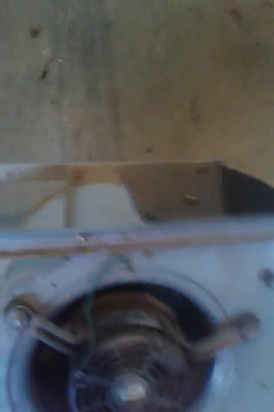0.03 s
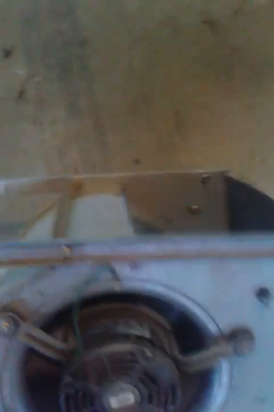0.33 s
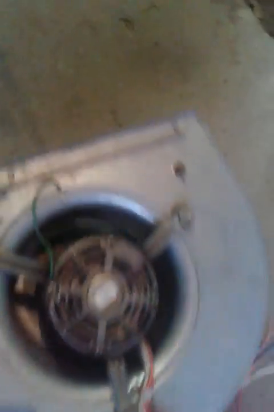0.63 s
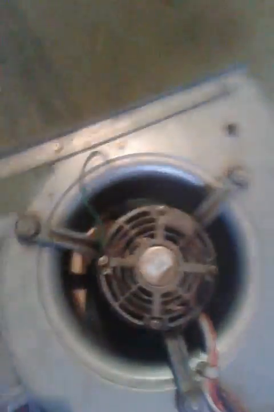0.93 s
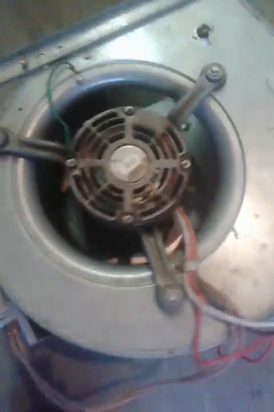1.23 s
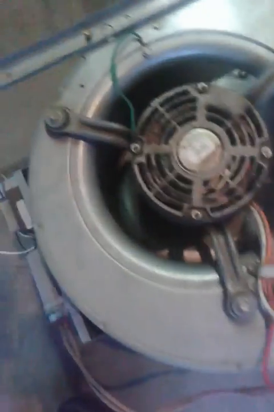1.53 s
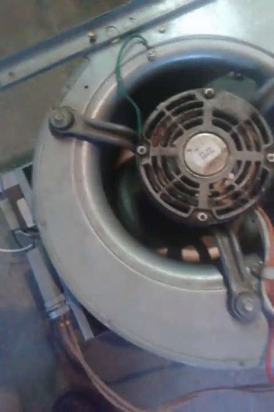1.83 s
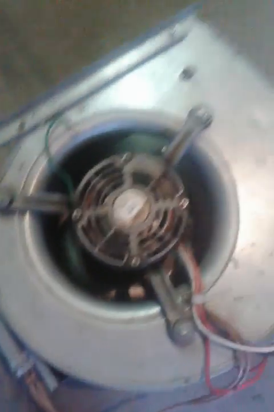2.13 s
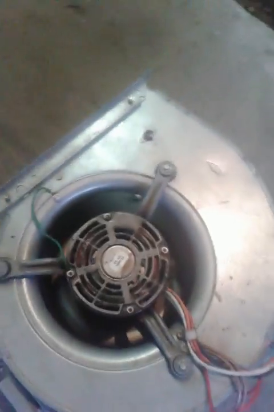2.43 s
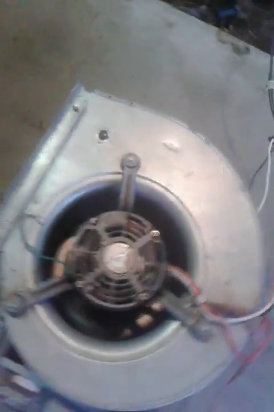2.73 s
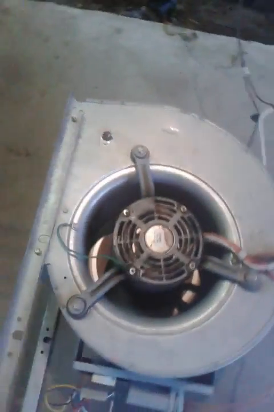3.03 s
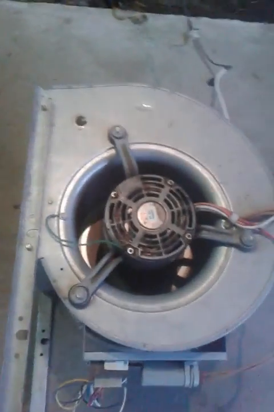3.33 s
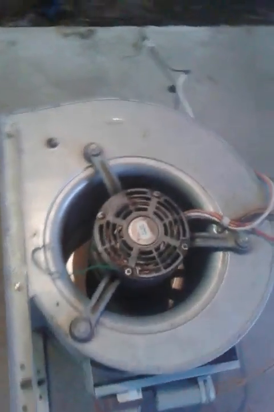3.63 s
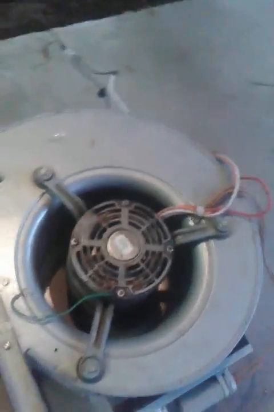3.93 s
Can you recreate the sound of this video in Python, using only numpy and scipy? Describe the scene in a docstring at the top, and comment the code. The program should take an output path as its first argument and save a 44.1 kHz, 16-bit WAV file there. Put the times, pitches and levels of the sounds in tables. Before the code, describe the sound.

A furnace blower runs with a steady roar and hiss of air, with light microphone bumps.

```python
"""A furnace blower runs on a workshop floor while a hand-held microphone moves in over its intake.
Turbulent air roars and drones in the scroll housing and hisses through the blades, with a thin wheel
whine and a faint mains hum. The colour shifts as the microphone travels from outlet to intake to back.
Near the intake the draught flutters and crackles on it, and the hand bumps it a few times."""
import sys
import numpy as np
from scipy import signal
from scipy.fft import rfft, irfft
from scipy.io import wavfile
from scipy.ndimage import uniform_filter1d

SR = 44100
rng = np.random.default_rng(int(sys.argv[2]) if len(sys.argv) > 2 else 0)


def store_wav(level_fs):
    """Save 16-bit WAV to argv[1]."""
    pcm = np.round(np.clip(np.atleast_2d(level_fs), -1, 1) * 32767)
    wavfile.write(sys.argv[1], SR, pcm.T.astype(np.int16))


N = 176400
TIME = np.arange(N) / SR

# Faders of the air noise, before trim (time [s], roar [dB], blade hiss [dB], top of the hiss [dB])
AIR_FADERS = [(0, -36, -32, -38.5), (.28, -32, -28.5, -33.5), (.58, -27.5, -26, -30.5),
              (.84, -23.5, -19, -23.5), (1.15, -24.5, -18.5, -25), (1.45, -25, -16, -27),
              (1.62, -26.5, -18, -29.5), (1.87, -27.5, -17.5, -27.5), (2.1, -26, -19.2, -25.5),
              (2.3, -25, -21, -27), (2.5, -25, -21, -27), (3, -24.5, -23, -30.5), (3.55, -25.5, -22, -29),
              (4, -23, -21, -28.5)]
# Relative EQ of the roar at each place (frequency [Hz], outlet [dB], intake [dB], back [dB])
ROAR_EQ = [(20, -30, -23, -33), (38.3, -32, -24, -36), (62.6, -7, -5, -11), (117, -1, 2.5, 1.5),
           (248, 4.5, 0.5, 8), (307, 6, 3, 4), (357, 8.5, 6.5, 0.5), (396, 7, 6, 0), (500, 1.5, -4, 3),
           (600, -3.5, -8, 5), (643, -2.5, -15, -1), (740, 3.5, 3.5, 4), (905, -3, -2, 2), (965, 5, 3, 0.5),
           (1240, -1, 1, -0.5), (1480, -4, -0.5, -1), (1840, -1, 2.5, -1), (2650, -1.5, -4.5, 1),
           (4100, -26, -7, -6.5), (7000, -46, -53, -56), (12000, -82, -91, -81)]
def roar(trim_db=3.5):
    """Turbulent air roars in the scroll housing."""
    return amp(curves(AIR_FADERS)[0] + trim_db) * placed_noise(ROAR_EQ)


# Relative EQ of the hiss at each place (frequency [Hz], outlet [dB], intake [dB], back [dB])
HISS_EQ = [(500, -41, -47, -46), (1710, -15, -24, -21), (2210, -7, -11, -7), (2350, -3, -5.5, -4),
           (2650, 3, -1, 0), (2850, 0.5, 0.5, 1), (2980, -0.5, -1, 1.5), (3130, -4, -1.5, 0),
           (3300, -2.5, -3.5, -4), (3770, -3, -0.5, -2.5), (4440, -13, -5, -17), (5300, -23, -10, -16.5),
           (6570, -26, -24.5, -35), (12000, -84, -89, -97)]
# EQ of the top of the hiss (frequency [Hz], relative level [dB])
TOP_EQ = [(1500, -35), (3300, 1), (4300, 6), (5000, 2), (5700, -6.5), (6500, -11), (8000, -17.5),
          (9200, -27.5), (10500, -64), (15000, -70)]
def blade_hiss(hiss_trim_db=-1.5, top_trim_db=1):
    """Air hisses through the blades; only the bright top keeps its colour from place to place."""
    _, hiss_db, top_db = curves(AIR_FADERS)
    body = amp(hiss_db + hiss_trim_db) * placed_noise(HISS_EQ)
    return body + amp(top_db + top_trim_db) * noise(TOP_EQ)


# Gust cues (time [s], length before release [s], level [dB])
GUST_CUES = [(1.224, .022, -13.5), (1.272, .022, -24), (1.336, .011, -12), (1.356, .026, -13.7)]
# EQ of the gusts (frequency [Hz], relative level [dB])
GUST_EQ = [(1500, -30), (2400, -1), (2700, 1), (3200, -2.5), (3500, -2), (4100, -2.5), (4800, -14),
           (7000, -21), (11000, -70)]
def gusts(attack_s=0.0099, release_s=0.0065):
    """The draught adds short puffs of hiss: quick rise, hold and release."""
    envelope = np.zeros(N)
    for start, length, db in GUST_CUES:
        age = TIME - start
        attack = np.clip(age / attack_s, 0, 1)
        release = np.exp(-np.maximum(age - length, 0) / release_s)
        envelope += amp(db) * attack * release
    return envelope * noise(GUST_EQ)


def eddies(air, depth_db=0.91):
    """Turbulence lifts and drops short patches of the spectrum."""
    spectrum = signal.stft(air, nperseg=512, noverlap=384)[2]
    patches = uniform_filter1d(rng.standard_normal(spectrum.T.shape), 14, 0)  # 14 frames long
    patches = uniform_filter1d(patches, 5, 1)  # 5 bins wide
    return signal.istft(spectrum * amp(depth_db * unit(patches).T), nperseg=512, noverlap=384)[1][:N]


def airflow(flutter_db=0.41, swell_db=0.03):
    """The wheel's roar and fluttering hiss, stirred together by eddies."""
    hiss = blade_hiss() + gusts()
    air = roar() + hiss * amp(flutter_db * wander(rate_hz=35))
    return eddies(air) * amp(swell_db * wander(rate_hz=20))


# Floor bounce (time [s], lag behind the direct sound [ms], bass gain [0-1])
FLOOR_BOUNCE = [(0, 1.35, 0.37), (.7, 1.29, 0.34), (1.15, 1.25, 0), (1.42, 0.9, 0.42), (1.8, 1.14, 0.16),
                (2.1, 1.27, 0.3), (2.55, 1.29, 0.21), (2.9, 1.46, 0.38), (3.2, 1.6, 0.23), (4, 1.44, 0.23)]
def reflections(air, floor_cutoff_hz=2650, scroll_lag_ms=3.87, scroll_gain=0.042):
    """A dull, moving floor reflection and a fixed one in the scroll comb-filter the air noise."""
    frames = dict(nperseg=2048, noverlap=1792)
    hz, t, spectrum = signal.stft(air, SR, **frames)
    hz = hz[:, None]
    times, lag_ms, gain = np.transpose(FLOOR_BOUNCE)
    phase_per_ms = -2j * np.pi * hz / 1000
    floor_gain = np.interp(t, times, gain) / (1 + (hz / floor_cutoff_hz) ** 2)
    floor = floor_gain * np.exp(phase_per_ms * np.interp(t, times, lag_ms))
    scroll = scroll_gain * np.exp(phase_per_ms * scroll_lag_ms)
    return signal.istft(spectrum * (1 + floor + scroll), **frames)[1][:N]


# Faders of the housing resonances (time [s], low [dB], middle [dB], high [dB])
HOUSING_FADERS = [(0, -48, -56, -43), (.5, -37, -43, -36.5), (.72, -42, -31, -34), (.93, -30, -31, -25.5),
                  (1.15, -28, -29, -28.5), (1.35, -26.5, -25.5, -46), (1.6, -27.5, -28.5, -43),
                  (2.0, -23.5, -30, -30.5), (2.25, -29, -32.5, -33), (2.7, -24, -40, -43),
                  (3.15, -27, -44, -48), (3.6, -24.5, -28, -30.5), (4, -25, -34.5, -40)]
# Housing resonances (centre in front [Hz], centre behind the scroll [Hz], width [Hz])
HOUSING_MODES = [(199, 202, 111), (512, 548, 113), (813, 810, 170)]
def housing():
    """The air in the scroll rings at three resonances, tuned a little differently behind it."""
    behind = np.clip(curves(MIC_PATH)[0] - 1, 0, 1)
    out = np.zeros(N)
    for (front_hz, back_hz, width_hz), db in zip(HOUSING_MODES, curves(HOUSING_FADERS)):
        front = np.sqrt(1 - behind) * ringing(front_hz, width_hz)
        back = np.sqrt(behind) * ringing(back_hz, width_hz)
        out += amp(db) * (front + back)
    return out


def drone(trim_db=-8):
    """A steadier low note inside the lowest housing resonance, riding the same fader."""
    return amp(curves(HOUSING_FADERS)[0] + trim_db) * wavering(hz=186.3, waver_hz=6.98, flutter_db=3)


# Fader of the whine (time [s], level [dB])
WHINE_FADER = [(0, -56), (.2, -39), (.5, -36), (.95, -27), (1.15, -45), (1.4, -47), (4, -50)]
def wheel_whine():
    """The thin note of the wheel, which fades as the microphone leaves the outlet."""
    return amp(curves(WHINE_FADER)[0]) * wavering(hz=818.6, waver_hz=5.8, flutter_db=4)


# Fader of the crackle (time [s], level [dB])
CRACKLE_FADER = [(0, -72), (.85, -78), (.94, -45), (1.03, -36.5), (1.065, -41), (1.18, -65), (1.235, -35),
                 (1.285, -31.5), (1.33, -38), (1.385, -31), (1.5, -45.5), (1.64, -49), (1.705, -36.5),
                 (1.76, -45), (1.81, -38), (1.925, -65), (1.97, -39), (2.03, -59), (2.12, -75), (2.8, -84)]
# EQ of the crackle (frequency [Hz], relative level [dB])
CRACKLE_EQ = [(2000, -25), (5000, 3.5), (8000, 5.5), (9500, -1), (11000, -6.5), (13000, 4.5), (14300, 7),
              (16000, -30)]
def draught(roughness_db=2):
    """Fine uneven crackle while the microphone is in the air stream."""
    crackle = noise(CRACKLE_EQ) * amp(roughness_db * wander(rate_hz=250))
    return amp(curves(CRACKLE_FADER)[0]) * unit(crackle)


# Tick cues (time [s], level [dB])
TICK_CUES = [(1.08, -33), (1.793, -24.5)]
# Bump cues (time [s], pitch [Hz], peak level [dB])
BUMP_CUES = [(.655, 790, -18), (.70, 215, -23), (2.41, 125, -21), (2.995, 185, -18), (3.207, 200, -13.5),
             (3.803, 188, -13.5)]
def handling(tick_decay_s=0.007, bump_rise_s=0.018):
    """The hand on the microphone makes small bright ticks and soft bumps that each wake a note."""
    out = np.zeros(N)
    for start, db in TICK_CUES:
        envelope = (TIME >= start) * np.exp(-abs(TIME - start) / tick_decay_s)
        out += amp(db) * envelope * ringing(centre_hz=13600, width_hz=7300)
    for start, hz, db in BUMP_CUES:
        rise = np.maximum(TIME - start, 0) / bump_rise_s
        envelope = (rise * np.exp(1 - rise)) ** 2
        out += amp(db) * envelope * np.sin(2 * np.pi * hz * (TIME - start))
    return out


# Hum partials (frequency [Hz], level with the roar fader at its median [dB])
HUM_PARTIALS = [(120, -44.5), (240, -37.5)]
def motor_hum():
    """Mains hum rides the roar fader, so it grows as the microphone comes close."""
    roar_db = curves(AIR_FADERS)[0]
    hum = sum(amp(db) * np.sqrt(2) * np.sin(2 * np.pi * (hz * TIME + rng.random()))
              for hz, db in HUM_PARTIALS)
    return amp(roar_db - np.median(roar_db)) * hum


# The microphone's move round the blower (time [s], place [0 outlet, 1 intake, 2 back])
MIC_PATH = [(0, 0), (1.0, 0), (1.3, 1), (1.85, 1), (2.7, 2), (4, 2)]
def placed_noise(eq):
    """Noise that crossfades at equal power from one place's EQ to the next as the microphone travels."""
    place = curves(MIC_PATH)[0]
    hz, *colours = np.transpose(eq)
    return sum(np.sqrt(np.maximum(1 - abs(place - k), 0)) * noise(np.transpose([hz, db]))
               for k, db in enumerate(colours))


def noise(eq):
    """Noise of rms 1 with the given EQ."""
    eq_hz, db = np.transpose(eq)
    hz = np.fft.rfftfreq(N, 1 / SR)
    gain = amp(np.interp(np.log(hz + 1), np.log(eq_hz), db))
    return unit(irfft(rfft(rng.standard_normal(N)) * gain, N))


def ringing(centre_hz, width_hz):
    """Noise of rms 1 in a steep-sided resonance."""
    hz = np.fft.rfftfreq(N, 1 / SR) + 1
    detune = (hz ** 2 - centre_hz ** 2) / (hz * width_hz)
    return unit(irfft(rfft(rng.standard_normal(N)) / (1 + detune ** 2), N))


def wavering(hz, waver_hz, flutter_db, rate_hz=23.3):
    """A note of rms 1 whose pitch and level waver in the turbulent air."""
    cycles = np.cumsum(hz + waver_hz * wander(rate_hz)) / SR
    return unit(np.sin(2 * np.pi * cycles) * amp(flutter_db * wander(rate_hz)))


def wander(rate_hz):
    """Smooth random modulation of rms 1."""
    hz = np.fft.rfftfreq(N, 1 / SR)
    return unit(irfft(rfft(rng.standard_normal(N)) * (hz > 0) * np.exp(-(hz / rate_hz) ** 2), N))


def curves(table):
    """Each column of an automation table, sample by sample."""
    times, *columns = np.transpose(table)
    return [np.interp(TIME, times, column) for column in columns]


def amp(db):
    """Decibels to gain."""
    return 10 ** (np.asarray(db) / 20)


def unit(x):
    """Scales to rms 1."""
    return x / np.sqrt(np.mean(x ** 2) + 1e-20)


def scene():
    """Mono mix of the blower and what touches the microphone."""
    blower = reflections(airflow()) + housing() + drone() + wheel_whine() + motor_hum()
    return (blower + draught() + handling())[None]


def record(dry, cutoff_hz=14850):
    """A steep high cut on the whole mix."""
    lowpass = signal.firwin(511, cutoff_hz, window=("kaiser", 9), fs=SR)
    return signal.oaconvolve(dry, lowpass[None], "same")


dry = scene()
out = record(dry)
store_wav(out)
```